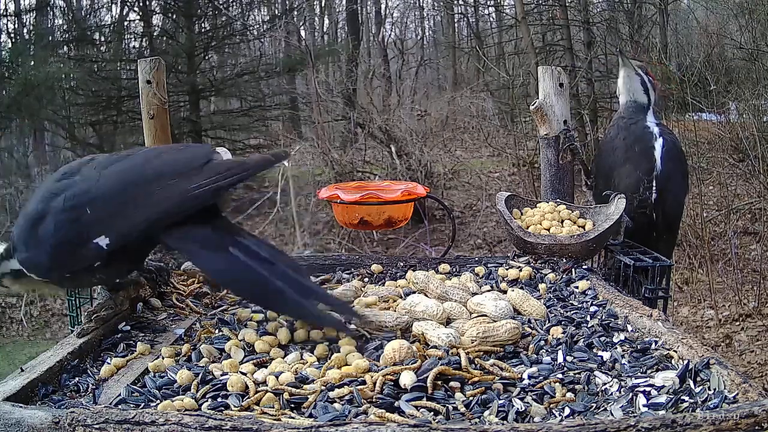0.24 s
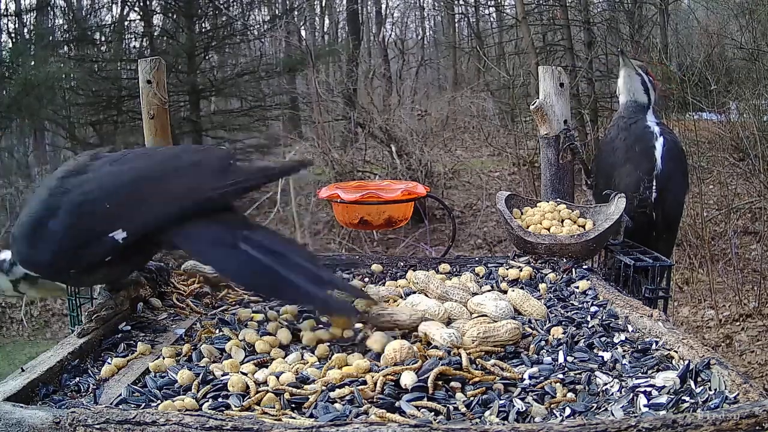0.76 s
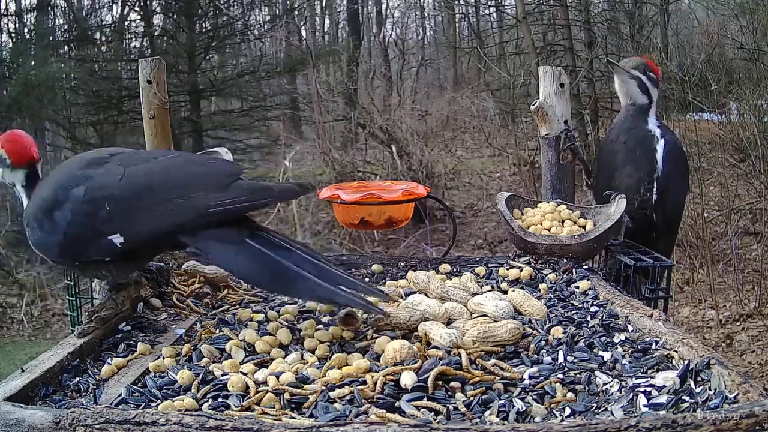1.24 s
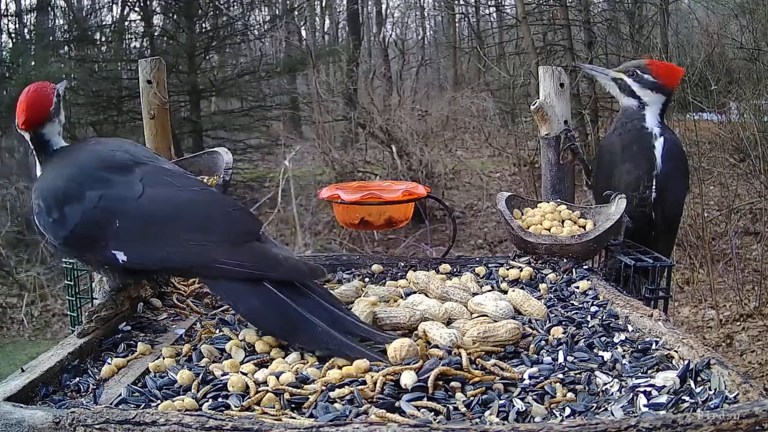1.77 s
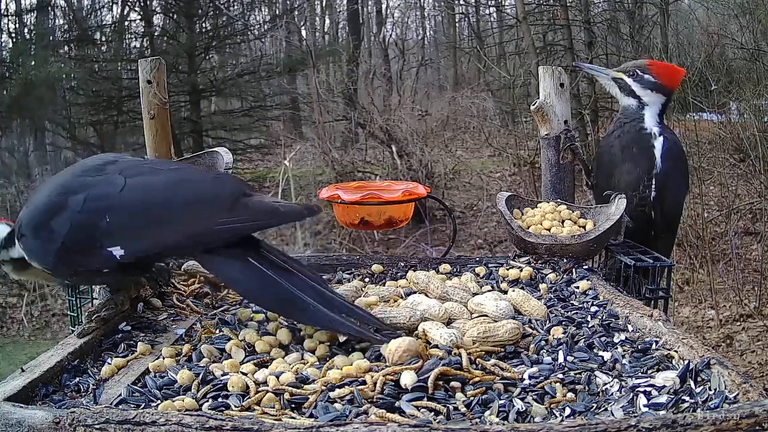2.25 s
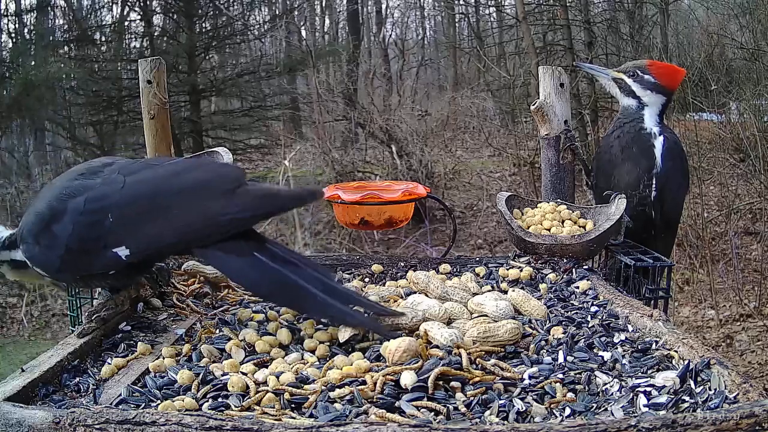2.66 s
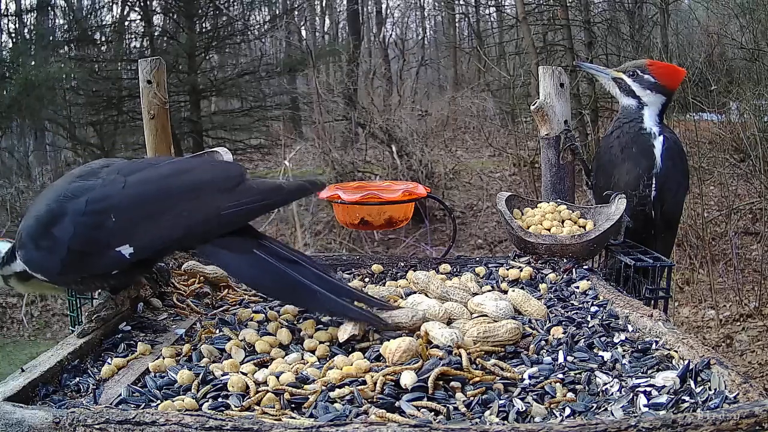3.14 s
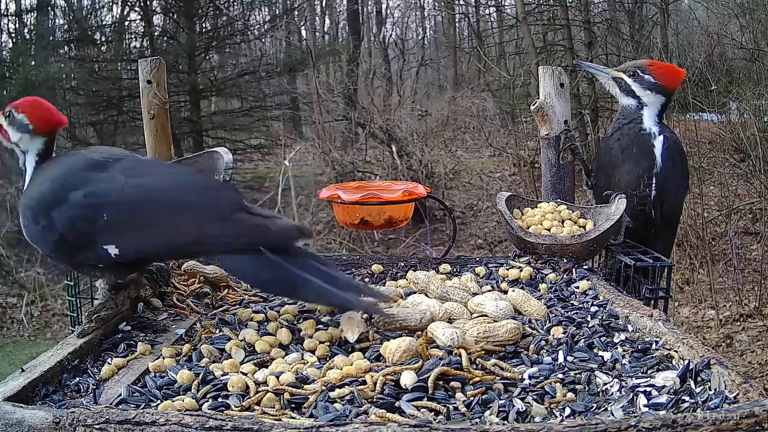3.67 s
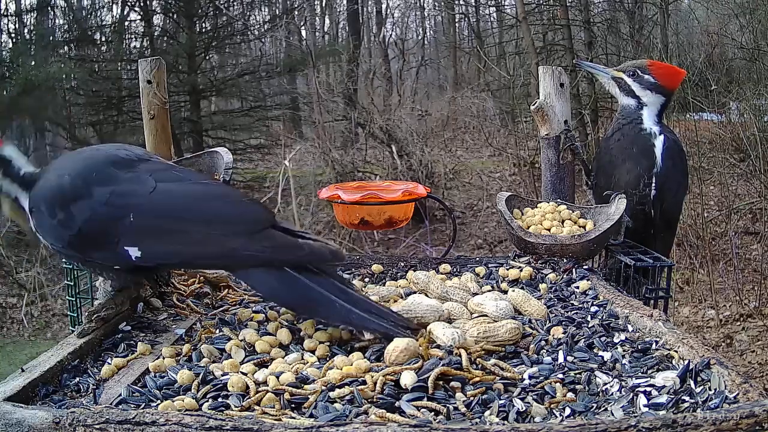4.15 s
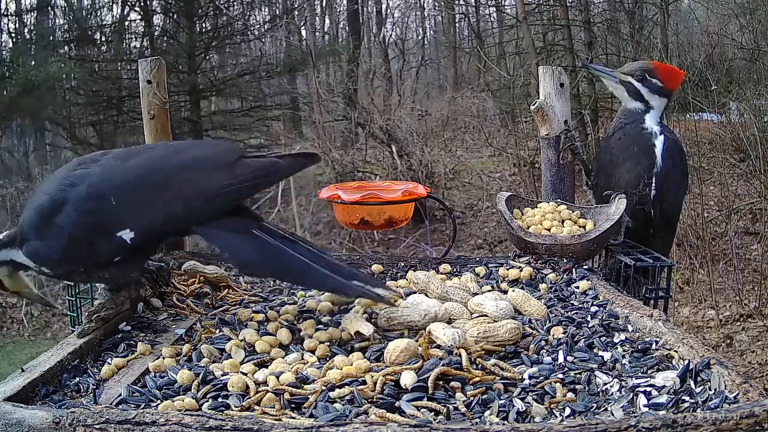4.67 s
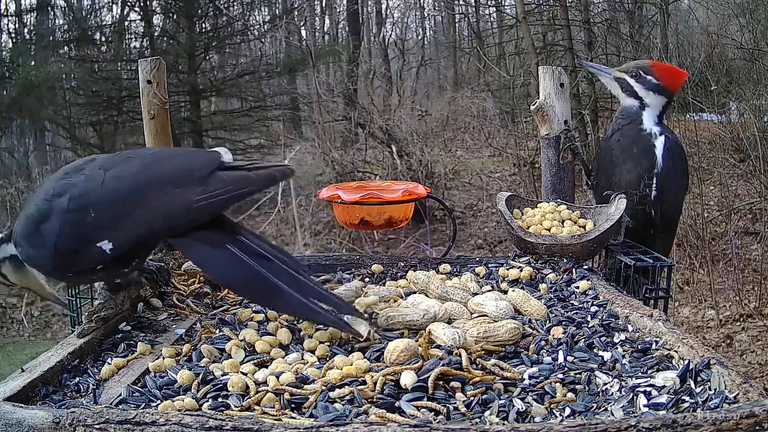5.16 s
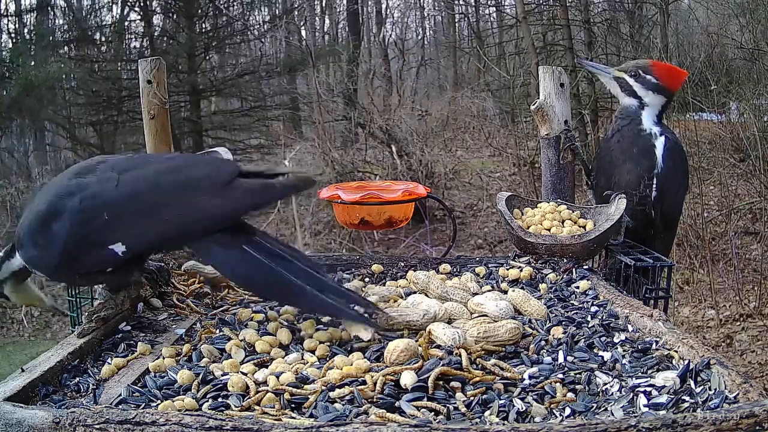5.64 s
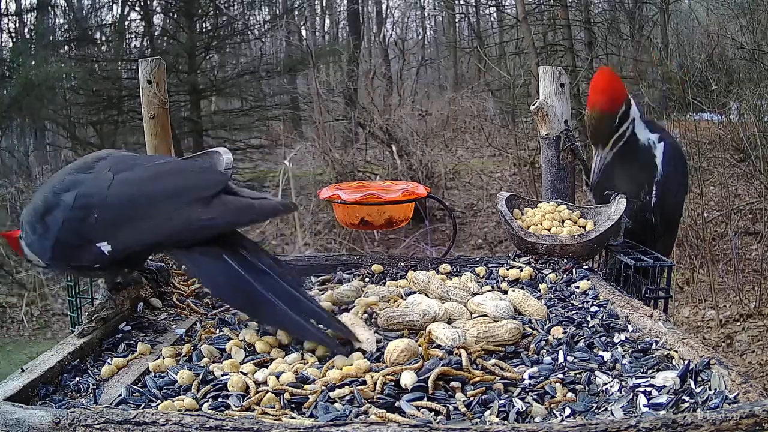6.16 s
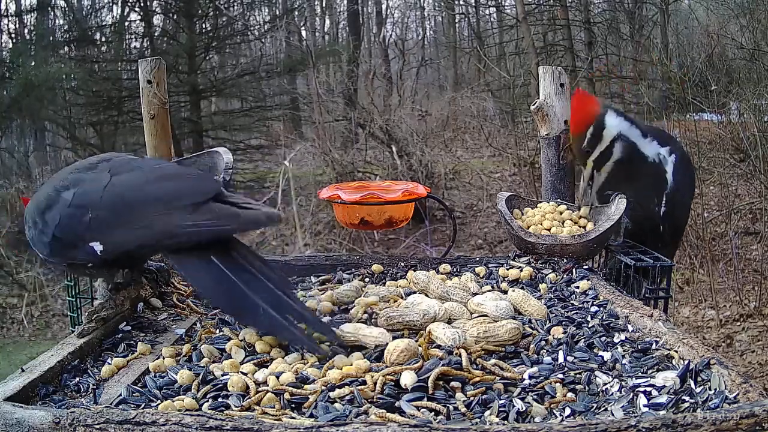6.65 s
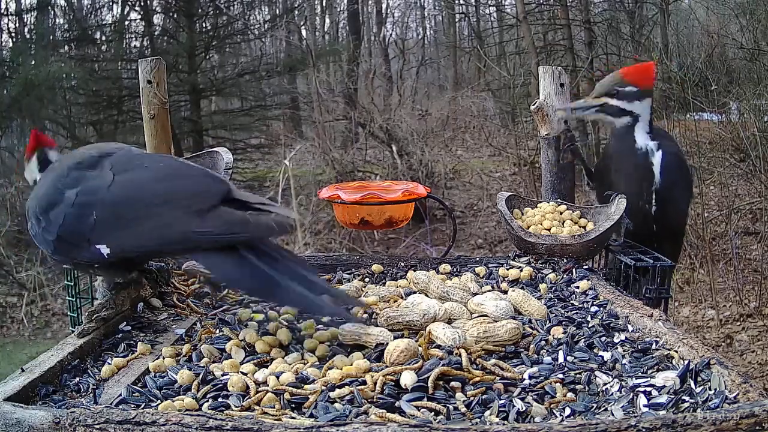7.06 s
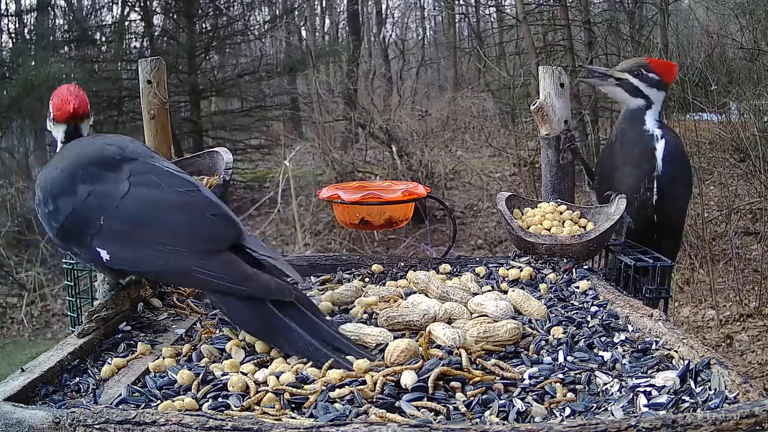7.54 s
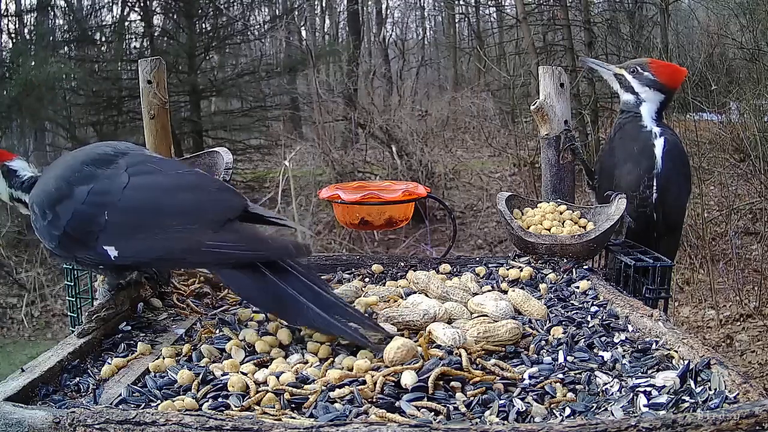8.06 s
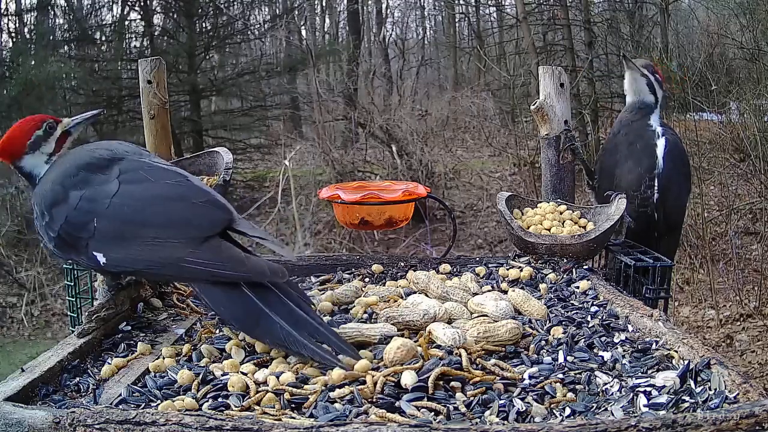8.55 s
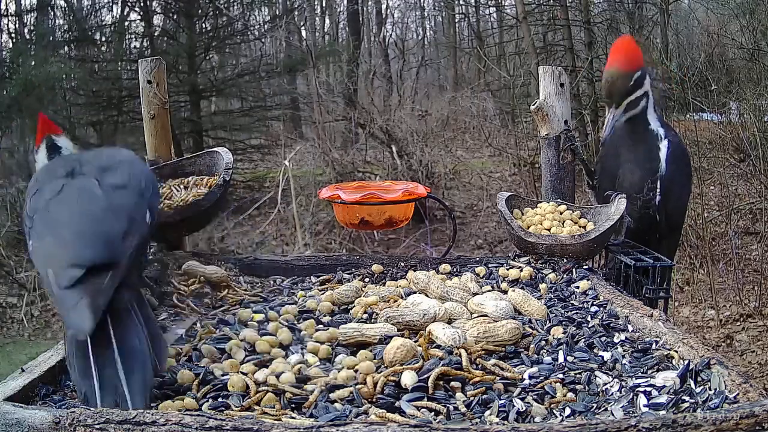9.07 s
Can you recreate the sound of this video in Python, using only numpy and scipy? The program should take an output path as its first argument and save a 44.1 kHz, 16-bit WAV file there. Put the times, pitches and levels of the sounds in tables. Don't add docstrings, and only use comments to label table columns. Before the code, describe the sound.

Very close on a wooden feeding tray, a woodpecker strikes three increasingly hard blows within the first second, boards booming and rattling, shells cracking. Lighter pecks follow, then another hard blow past the middle. A second bird knocks softly on a hollow wooden bowl. Songbird chips, thin peeps and faint nasal jay calls echo in bare woods over a low wandering engine drone and soft hiss.

```python
import sys
import numpy as np
from scipy import signal
from scipy.fft import rfft, irfft
from scipy.io import wavfile
from scipy.ndimage import uniform_filter1d

SR = 44100
rng = np.random.default_rng(int(sys.argv[2]) if len(sys.argv) > 2 else 0)


def file_out(sig):
    cols = np.atleast_2d(sig).T
    lim = np.clip(cols, -1, 1)
    pcm = np.round(lim * 32767).astype(np.int16)
    wavfile.write(sys.argv[1], SR, pcm)


def invert_db(x):
    u = np.asarray(x, float) / 20
    return 10 ** u


N = 410571

# start_s, knock_db, crack_db (re knock), board_fall_delay_s, board_fall_db
BLOWS = [
    (0.453, -35, -30, 0.042, -28.5),
    (0.729, -31, -23, 0.042, -28),
    (1.062, -26.5, -22, 0.041, -32),
    (2.597, -47.5, -24, .043, -64),
    (3.184, -38, -20, 0.043, -36.5),
    (3.657, -38.5, -17.5, 0.041, -39),
    (5.313, -47, -16, 0.043, -47),
    (5.642, -26.5, -21, 0.043, -29),
]


def coloured(points, db):
    hz, gain_db = np.transpose(points)
    f = np.maximum(np.fft.rfftfreq(N, 1 / SR), 1)
    gain = invert_db(np.interp(np.log(f), np.log(hz), gain_db, left=-60))
    x = irfft(rfft(rng.standard_normal(N)) * gain, N)
    return x / x.std() * invert_db(db)


def filtered(x, order, hz, kind):
    return signal.sosfilt(signal.butter(order, hz, kind, fs=SR, output="sos"), x)


def ring(x, modes):
    out = 0
    for hz, db, t60_s in modes:
        pole = np.exp(2j * np.pi * hz / SR - np.log(1000) / (t60_s * SR))
        out = out + invert_db(db) * signal.lfilter([0, pole.imag], [1, -2 * pole.real, abs(pole) ** 2], x)
    return out


def add(track, start_s, x):
    i = int(start_s * SR)
    track[i:i + len(x)] += x[:N - i]


def glide(at_s, hz, db):
    t = np.arange(at_s[0], at_s[-1], 1 / SR)
    phase = 2 * np.pi * np.cumsum(np.interp(t, at_s, hz)) / SR
    return phase, np.sqrt(2) * invert_db(np.interp(t, at_s, db))


def wood(x, t60_s, gap_s):
    t = np.arange(int(t60_s * SR)) / SR
    tail = rng.standard_normal(len(t)) * np.exp(-np.log(1000) * t / t60_s) * np.minimum(t / gap_s, 1)
    return signal.fftconvolve(x, tail / np.sqrt(np.sum(tail ** 2)))[:N]


def walk(rate_hz, count=N):
    k = int(SR / rate_hz)
    steps = np.repeat(rng.standard_normal(count // k + 1), k)
    x = uniform_filter1d(uniform_filter1d(steps, k), k)[:count]
    return x / x.std()


def crunch(shape, rise_s, fall_s):
    t = np.arange(shape[-1]) / SR
    envelope = np.exp(-t / fall_s) * (1 - np.exp(-(t / rise_s) ** 2))
    grains = invert_db(3.0 * rng.exponential(size=len(t)))
    grit = rng.standard_normal(shape) * envelope * grains
    return unit_energy(grit)


def unit_energy(x):
    return x / np.sqrt(np.sum(x ** 2, axis=-1, keepdims=True))


def motors(t):
    # at_s, pitch_hz, level_db
    engine = [(0, 113.7, -60.5), (.3, 112.3, -48.5), (.6, 115.1, -42.5), (1.2, 119.2, -49),
              (2.05, 121.1, -50), (2.4, 111.5, -52), (2.8, 111, -82), (3.5, 114.6, -50), (4.3, 113.5, -53),
              (5.3, 113.7, -48), (5.6, 111.1, -45), (6.2, 104.4, -63.5)]
    # start_s, length_s, start_hz, end_hz, level_db
    drones = [
        (1.1, 2.4, 93.1, 102.6, -59),
        (4.6, 1.85, 253, 252, -66),
        (7.2, 1.585, 172, 183.2, -72),
    ]
    drone = np.zeros(N)
    phase, gain = glide(*np.transpose(engine))
    add(drone, engine[0][0], gain * np.sin(phase))
    fade_s, fade_db = 0.14, -7
    for start_s, length_s, start_hz, end_hz, db in drones:
        at_s = np.array([0, fade_s, length_s - fade_s, length_s])
        hz = start_hz + (end_hz - start_hz) * at_s / length_s
        phase, gain = glide(at_s, hz, db + fade_db * np.array([1, 0, 0, 1]))
        add(drone, start_s, gain * np.sin(phase))
    return drone * invert_db(0.96 * walk(6.4))


def yard():
    # at_s, level_db
    rumble = [(0, -2.5), (.7, 2), (2.2, 0.5), (4.3, -0.5), (5.6, 2.5), (6.1, 2), (6.6, -0.5), (6.9, -2.5),
              (7.2, -0.5), (7.9, -0.5), (8.6, -1), (9.31, -0.5)]
    # freq_hz, level_db (per Hz)
    town = [(18, 7), (64, 0.5), (90, -4), (125, -7), (152, -16), (200, -20.5), (240, -19.5), (314, -21),
            (417, -25), (500, -25), (555, -26.5), (620, -27), (727, -36), (1000, -53.5)]
    # freq_hz, level_db (per Hz)
    air = [(500, -26), (800, -0.5), (1300, -1.5), (2000, -5), (3500, -8), (4500, -10), (8000, -8.5),
           (12000, -8.5), (15500, -12.5)]
    # freq_hz, level_db
    whines = [(9001, -95.5), (12000, -90.5)]
    # at_s, level_db
    fan_swell = [(0, 1), (1.2, -3), (2.05, 7), (2.6, -0.5), (3.2, 1.5), (4.2, 1.5), (5.05, 3.5), (5.8, 1.5),
                 (6.6, -1), (7.4, 1.5), (8.2, -2), (9.31, -2)]
    t = np.arange(N) / SR
    near_db = np.interp(t, *np.transpose(rumble))
    low = [p for p in town if p[0] < 140] + [(140, -16.0), (180, -68)]
    deep = coloured(low, 0.13) * invert_db(-47.5 + near_db + 1.6 * walk(5.4))
    high = [(100, -39.0)] + [p for p in town if p[0] >= 140] + [(1400, -67.0)]
    wash_db = -60 + 0.68 * near_db - 0.1246 * t
    wash = coloured(high, 0.18) * invert_db(wash_db + 0.56 * walk(4.4))
    fan = filtered(rng.standard_normal(N), 2, (520.7, 586.4), "band")
    fan_db = -69 + np.interp(t, *np.transpose(fan_swell)) + 1.95 * walk(8)
    wash += fan / fan.std() * invert_db(fan_db)
    whine = sum(np.sqrt(2) * invert_db(db) * np.sin(2 * np.pi * hz * t) for hz, db in whines)
    hiss = coloured(air, -69.5) * invert_db(0.062 * walk(21))
    return motors(t) + deep + wash + hiss + whine


def contacts():
    # start_s, level_db, ring_hz, click_db (re ring)
    taps = [(.058, -69, 1000, -26), (5.125, -60, 1200, -20), (0.386, -53, 1390, -29),
            (0.584, -52, 1110, -26), (0.837, -51, 1090, -12), (0.858, -50, 1130, -24),
            (0.914, -61, 1030, -17), (1.058, -41, 1130, -20), (1.082, -46, 1060, -20),
            (1.114, -38, 1140, -12), (0.504, -49, 1130, -28), (.569, -57, 1100, -18),
            (.847, -53, 1200, -22), (1.169, -53, 1150, -21), (1.191, -55, 1200, -21), (1.21, -55, 965, -19),
            (2.721, -47, 1300, -26), (2.77, -61, 1110, -14), (3.044, -61, 1270, -15),
            (3.852, -52, 1335, -22), (4.664, -54, 1390, -12), (5.322, -52, 1075, -17.5),
            (5.333, -55, 1200, -20), (5.378, -58, 1150, -22), (5.398, -54, 1100, -22),
            (.7855, -50, 1100, -24), (5.775, -51, 1200, -22), (1.05, -58, 1360, -13),
            (5.408, -52, 1040, -21), (5.669, -32, 1380, -15), (6.859, -47, 1060, -26),
            (6.948, -49, 1280, -27), (6.969, -48, 1380, -21), (7.117, -48.5, 1450, -14),
            (7.29, -52, 1300, -12), (7.974, -56, 1143, -14), (9.008, -54, 1110, -15),
            (9.273, -72.5, 930, -14), (9.297, -51.5, 1510, -9)]
    board_hz, light_click_db, light_boom_db = 1130, -36, -14.5
    rows = []
    for s, db, _, lag_s, fall_db in BLOWS:
        click_db = -17.5 + 4 * (fall_db + 26.5)
        rows.append((s + lag_s, fall_db, board_hz, click_db, db - fall_db - 7.5))
        rows.append((s + lag_s + 0.022, fall_db - 11.5, 1300, light_click_db, light_boom_db))
        if fall_db > -33:
            rows.append((s + 0.118, db - 14.5, board_hz, light_click_db, light_boom_db))
    return rows + [(*tap, light_boom_db) for tap in taps]


def light_contacts(bus):
    light = contacts()
    t = np.arange(900) / SR
    onset = 1 - np.exp(-(t / .002) ** 2)
    for (s, db, hz, click_db, boom_db), (turn, upper) in zip(light, rng.random((len(light), 2))):
        upper_hz = hz * (1.09 + 0.19 * upper)
        body = np.sin(2 * np.pi * hz * t) + 0.54 * np.sin(2 * np.pi * upper_hz * t + 6 * turn)
        add(bus["rattle"], s - .001, invert_db(db + 3.0) * onset * np.exp(-t / 0.003) * body)
        grit = rng.standard_normal(len(t)) * onset * np.exp(-t / 0.002)
        add(bus["crack"], s - .001, invert_db(db + click_db - 13.0) * grit)
        add(bus["hiss"], s - .001, invert_db(db + click_db + 1.0) * grit)
        add(bus["thud"], s - .001, invert_db(db + 0.5) * grit)
        add(bus["boom"], s, invert_db(db + boom_db) * np.hanning(60) / 30)


def blows(bus):
    # boom_db, deep_db, knock_db
    spots = [(-1, -4, -0.5), (5, 0, -3), (0, -7, 2), (1, -1, 2.5), (1, -8, 2), (-2, -5, -2), (-9, -10, 2),
             (2, 2, 2.5)]
    panel_levels = [-43, -36, -34, -62, -54, -59, -57, -33]
    # start_s, level_db
    thumps = [
        (5.33, -41),
        (.46, -40),
        (1.078, -35),
        (.757, -38.5),
        (2.607, -53),
        (5.658, -36),
    ]
    for (s, db, crack_db, *_), (boom_db, deep_db, knock_db), panel_db in zip(BLOWS, spots, panel_levels):
        add(bus["panel"], s + 0.01198, invert_db(panel_db) * np.hanning(24) / 12)
        s, grit = s - .003, crunch((4, 2600), 0.012, 0.011)
        add(bus["thud"], s, invert_db(db + 2.0) * grit[3])
        tip = invert_db(-11 + 0.96 * (db + 37.5)) * crunch((2, 1800), 0.0028, 0.011)
        add(bus["thud"], s + 0.00141, invert_db(-19.0) * tip[0])
        add(bus["crack"], s + 0.00192, invert_db(-57.0) * tip[1])
        add(bus["thud"], s, invert_db(db + 5) * crunch((5000,), 0.01, 0.051))
        push = -np.hanning(90) / 45
        add(bus["boom"], s + 0.00719, invert_db(db + boom_db - 8.5) * push)
        add(bus["deep"], s + 0.0054, invert_db(db + deep_db - 6.5) * push.sum() * np.hanning(120) / 60)
        add(bus["deep"], s, invert_db(db + deep_db + 0.5) * grit[3])
        add(bus["boom"], s, invert_db(db + boom_db - 1.5) * grit[0])
        add(bus["knock"], s, invert_db(db + knock_db - 3.5) * grit[1])
        add(bus["crack"], s, invert_db(db + crack_db - 3.5) * grit[2])
        even = grit[2] * .08 / (.08 + abs(grit[2]))
        add(bus["hiss"], s, invert_db(1.1 * (db + crack_db) + 23.0) * even)
        add(bus["sway"], s + 0.01, invert_db(-29.5 + 0.68 * (db + 31.0)) * np.hanning(300) / 150)
    for s, db in thumps:
        add(bus["boom"], s, invert_db(db) * np.hanning(70) / 35)


def shells(bus):
    # start_s, level_db, hiss_db (re crack)
    splits = [(0.457, -59.5, -30), (.481, -76, -14), (0.708, -74, -4), (0.7354, -48.5, -5), (.75, -63, -5),
              (.7585, -68, -8), (1.0586, -60, 6), (1.0649, -51, -4), (1.072, -54, -7), (1.0831, -48, -7),
              (1.1, -55, -12), (1.1128, -56.5, -11), (1.131, -70, -2), (0.4928, -55, -14), (.516, -68, -20),
              (.768, -53, -12), (0.8366, -73, 1), (.858, -77, -12), (2.597, -66, -16), (3.225, -70, -14),
              (5.707, -69, -12), (5.76, -76, -11), (3.183, -59, -15), (3.1892, -61, -18),
              (3.6583, -62, -18), (5.6486, -45.5, -10), (5.654, -47, -11), (5.663, -51, -12),
              (5.668, -52, -13), (5.6835, -54, -9)]
    # start_s, level_db
    snaps = [
        (1.7586, -91),
        (1.8292, -82.5),
        (2.194, -75.5),
        (5.1256, -96),
        (6.9192, -90),
        (6.9698, -81.5),
    ]
    t = np.arange(900) / SR
    for s, db, hiss_db in splits:
        noise = rng.standard_normal((2, len(t)))
        snap = noise[0] * np.exp(-t / 0.0017)
        add(bus["crack"], s, invert_db(db - 12) * snap)
        add(bus["hiss"], s, invert_db(db + hiss_db + 10) * noise[1] * np.exp(-t / 0.0026))
        add(bus["thud"], s, invert_db(db + 1) * snap)
    for s, db in snaps:
        add(bus["hiss"], s, invert_db(db + 30.5) * rng.standard_normal(300) * np.exp(-t[:300] / 0.0019))


def tray():
    # freq_hz, level_db, t60_s
    deep_modes = [(132, -30, 0.063), (149, -3.5, 0.19), (189.4, -1.5, 0.29), (217.5, -10, 0.25)]
    boom_modes = [(281, 5, 0.092), (304.6, 3.5, 0.12), (362, -14, 0.018), (372, -8.5, 0.13),
                  (448, -4.5, 0.058), (505, -8.5, 0.09), (557, -8, 0.097), (707, -11.5, 0.025)]
    knock_modes = [(738.4, -6.5, 0.12), (836, -13.5, 0.064), (1040, -28, 0.063), (1121, 1, 0.056),
                   (1200, -11, 0.14), (1295, -5.5, 0.051), (1450, -36, 0.044), (1784, -7, 0.014),
                   (2070, -5.5, 0.016)]
    crack_modes = [(1980, 5, 0.0061), (2400, 5.5, 0.0066), (2860, -16, 0.0058), (2900, 6, 0.0073),
                   (3140, 4, 0.019), (3360, -39, 0.016), (4210, -53, 0.0079)]
    panel_modes = [(743.5, -2.5, 0.12), (553, -4, .08)]
    sway_modes = [(30, -27, .3), (48.23, 2.5, 0.71), (58.4, -37, 0.4)]
    names = ("deep", "boom", "knock", "crack", "panel", "sway", "rattle", "hiss", "thud")
    bus = {name: np.zeros(N) for name in names}
    light_contacts(bus)
    blows(bus)
    shells(bus)
    bright = filtered(bus["hiss"], 2, [4200, 12500], "band")
    body = filtered(bus["thud"], 2, [450, 3000], "band") + ring(bus["crack"], crack_modes)
    body = filtered(body, 6, 3900, "low")
    boards = ring(bus["deep"], deep_modes) + ring(bus["boom"], boom_modes) + ring(bus["knock"], knock_modes)
    frame = ring(bus["panel"], panel_modes) + ring(bus["sway"], sway_modes)
    return boards + frame + body + bus["rattle"] + bright


def small_birds():
    peep_times = [0.337, 1.151, 1.539, 1.780, 2.254, 2.352, 3.256, 3.563, 3.767, 3.827, 3.927, 4.215, 4.462,
                  4.559, 4.834, 5.171, 5.261, 5.565, 5.870, 6.132, 6.430, 6.689, 6.919, 7.176, 7.477, 7.704,
                  8.010, 8.318, 8.757, 9.132]
    # start_s, level_db, blur_db (echo re direct)
    chips = [
        (0.9487, -57.5, -1),
        (1.894, -48.5, -8),
        (3.1358, -49.5, -15),
        (4.121, -45, -15),
        (5.022, -44, -21),
        (6.172, -45.5, -14),
        (7.389, -62.5, 4),
        (8.251, -52.5, -11),
    ]
    # at_s, pitch_hz, level_db
    chip_shape = [(0, 5350, -46), (.002, 5520, -1), (.005, 6590, 6), (.008, 7540, 1), (0.012, 7600, -5),
                  (0.019, 7840, -6), (.025, 7900, -19)]
    dry, wet = np.zeros((2, N))
    peep = np.hanning(330)
    t = np.arange(len(peep)) / SR
    for s, bend in zip(peep_times, rng.standard_normal(len(peep_times))):
        add(dry, s - .002, invert_db(-64) * peep * np.sin(2 * np.pi * (5640 + 30 * bend) * t))
    at_s, hz, shape_db = np.transpose(chip_shape)
    for (s, db, blur_db), bend in zip(chips, rng.standard_normal(len(chips))):
        phase, gain = glide(at_s, hz * (1 + 0.008 * bend), shape_db + db - 7.5)
        octave = invert_db(-4.5) * np.sin(2 * phase) * np.exp(-np.arange(len(phase)) / 130)
        note = gain * (np.sin(phase) + octave)
        add(dry, s - .002, note)
        add(wet, s, invert_db(blur_db) * note)
    return dry + wood(wet, 0.59, 0.0034)


def jays():
    # start_s, length_s, level_db, pitch_factor, final_drop_depth
    calls = [
        (1.729, 0.29, -65, 1.0, 1.0),
        (4.35, 0.26, -65.5, 0.99, 0.9),
        (5.964, .283, -66, 1.003, 1.03),
        (8.584, 0.27, -68.5, 0.99, 1.29),
    ]
    # echo_db, top_overtone_db
    turns = [(-1.5, 2), (-3, -14), (0, -2), (-3, -3)]
    # share_of_length, pitch_hz, effort_db
    call_shape = [(0, 786, -8), (.022, 800, -8), (.04, 890, -15), (.065, 912, -7), (.3, 900, -1),
                  (.6, 889.6, 0), (.8, 876, -1.5), (.88, 853, -3), (.94, 836, -3), (.97, 812, -8),
                  (1, 788, -14)]
    # multiple, level_db, db_per_effort_db, echo_db
    tones = [(2, -2.5, 1, -0.5), (3, -0.5, 1.3, -2), (4, -3, 0.45, 1), (6, -16.5, 2.5, 0)]
    # start_s, length_s, pitch_hz, level_db
    gulps = [
        (1.996, 0.029, 2520, -61.5),
    ]
    dry, away = np.zeros((2, N))
    share, hz, effort_db = np.transpose(call_shape)
    for (s, length_s, db, scale, drop), (echo_db, top_db) in zip(calls, turns):
        pitch_hz = scale * np.where(hz < 870, 870 - drop * (870 - hz), hz)
        for multiple, tone_db, follows, far_db in tones:
            multiple = round(multiple)
            level_db = db + tone_db + top_db * (multiple > 5) + follows * effort_db
            phase, gain = glide(share * length_s, pitch_hz, level_db)
            beat = walk(45, count=len(phase))
            blur = walk(120, count=len(phase))
            add(dry, s, gain * invert_db(1.7 * beat) * np.sin(multiple * phase))
            tone = gain * np.sin(multiple * (phase + np.cumsum(.006 * blur * np.gradient(phase))))
            turn_db = 18 * np.linspace(-1, 0, len(tone))
            add(away, s, tone * invert_db(echo_db + far_db + turn_db))
    for s, length_s, gulp_hz, db in gulps:
        n = int(length_s * SR)
        add(dry, s, invert_db(db + 4.5) * np.hanning(n) * np.sin(2 * np.pi * gulp_hz * np.arange(n) / SR))
    high = filtered(away, 2, 2800, "high")
    echo = wood(high * invert_db(4.9 * walk(250)), 0.84, 0.025) * invert_db(1.2 * walk(40))
    return dry * invert_db(0.44 * walk(40)) + invert_db(4.5) * echo


def rustles():
    # start_s, length_s, centre_hz, level_db
    swells = [
        (2.7, 0.12, 5700, -82),
        (4.245, 0.3, 6200, -73),
        (4.24, .15, 16000, -86),
        (6.05, 0.23, 5000, -73.5),
        (8.742, 0.22, 4500, -74),
    ]
    out = np.zeros(N)
    for s, length_s, hz, db in swells:
        n = int(length_s * SR)
        noise = filtered(rng.standard_normal(n), 1, [0.68 * hz, 1.25 * hz], "band")
        add(out, s, invert_db(db + 7.0) * np.hanning(n) * noise)
    return out


def far_calls(calls, phrase, wet_db, t60_s):
    notes = [(s + at_s, length_s, start_hz, end_hz, db + note_db)
             for s, db in calls for at_s, length_s, start_hz, end_hz, note_db in phrase]
    dry = np.zeros(N)
    flutter = 2 * np.pi * np.cumsum(.016 * notes[0][3] * walk(80)) / SR
    for s, length_s, start_hz, end_hz, db in notes:
        at_s = np.array([0, .2, .8, 1]) * length_s
        hz = start_hz + np.array([0, .3, .9, 1]) * (end_hz - start_hz)
        phase, gain = glide(at_s, hz, db + np.array([3.5, 0.5, -2.0, -11]))
        add(dry, s, gain * np.sin(phase + flutter[int(s * SR):][:len(phase)]))
    dry *= invert_db(2.5 * walk(70))
    echo = invert_db(wet_db) * wood(dry, t60_s, 0.03) * invert_db(4 * walk(200) - 1)
    return (dry + echo) * invert_db(1.5 * walk(30) - 1)


def far_cackle():
    # start_s, level_db
    calls = [(2.88, -82), (4.42, -76), (4.55, -76), (4.92, -80), (5.1, -77.5), (5.36, -68.5), (5.43, -71.5),
             (5.52, -74), (5.82, -65.5), (6.08, -73), (6.32, -68), (6.62, -72), (6.84, -77), (7.05, -75),
             (7.22, -72.5), (7.32, -76), (7.42, -80)]
    # at_s, length_s, start_hz, end_hz, level_db
    arch = [
        (0, 0.0435, 1200, 1440, 0),
        (.045, .04, 1416, 1248, -4.5),
    ]
    return far_calls(calls, arch, 1.5, 1.6)


def far_song():
    # start_s, level_db
    calls = [
        (3.7, -77.5),
        (3.965, -77),
        (7.655, -79.5),
        (7.98, -76),
        (8.305, -76),
    ]
    # at_s, length_s, start_hz, end_hz, level_db
    phrase = [
        (0, 0.044, 2146, 2336, -2),
        (0.048, 0.035, 2400, 2746, 2),
        (0.091, 0.0355, 2600, 2185, 0.5),
        (0.143, .03, 2380, 2540, 3.5),
        (0.205, 0.06, 2220, 2630, -2),
    ]
    return far_calls(calls, phrase, 2.7, 0.73)


def bowl():
    # start_s, level_db, softness (0-1)
    hits = [
        (3.701, -43.5, 0.95),
        (6.466, -40, 0.72),
        (6.912, -48.5, 0.96),
        (6.959, -58, 0.91),
        (7.0, -53, 0.95),
    ]
    # freq_hz, level_db, t60_s
    bowl_modes = [(302, -1.5, 0.19), (332, 2.5, 0.13), (417, 2, 0.043), (538, 6.5, 0.1), (583, -7, 0.042),
                  (750, 2, 0.057), (900, -12, 0.035), (1108, 6, 0.05), (1260, -13, .05), (1610, -21, 0.022),
                  (2300, -23, 0.061), (2940, -25, .03)]
    force = np.zeros(N)
    push = unit_energy(np.hanning(int(0.002 * SR)))
    for s, db, soft in hits:
        soft = np.clip(soft, 0, .98)
        touch = signal.lfilter([(1 - soft) ** 2], [1, -2 * soft, soft ** 2], crunch((1600,), 0.0047, 0.014))
        add(force, s, invert_db(db + 2.0) * touch)
        add(force, s + 0.00406, -invert_db(db - 15) * (1 - soft) * push)
    return ring(force, bowl_modes) + invert_db(18) * filtered(force, 2, (280, 2600), "band")


def scene():
    birds = small_birds() + jays() + far_cackle() + far_song()
    mono = yard() + tray() + birds + rustles() + bowl()
    return np.array([mono, mono])


def band_limit(x):
    return signal.sosfilt(signal.butter(12, 15700, fs=SR, output="sos"), x)


def record(dry):
    # at_s, above_hz
    smeared = [
        (.95, 6900),
        (.97, 6900),
        (1.905, 6600),
        (5.04, 5300),
        (8.265, 6500),
    ]
    f, t, z = signal.stft(.2 * np.tanh(dry[0] / .2), SR, nperseg=2048, noverlap=1024)
    band = (f // 517).astype(int)
    bins = [np.abs(z[band == b]) ** 2 for b in range(band[-1] + 1)]
    power = np.array([p.mean(axis=0) for p in bins])
    peaky = np.array([p.max(axis=0) for p in bins]) / power
    loud = power / np.median(power, axis=1, keepdims=True)
    luck = uniform_filter1d(rng.standard_normal(power.shape), size=3, axis=0)
    luck = uniform_filter1d(luck, size=2, axis=1)
    noisy = (luck > -.33 + .13 * loud) & (peaky < 6)
    treble = (f > 4100) & (abs(f - 11900) > 250)
    swapped = noisy[band] & treble[:, None]
    for s, hz in smeared:
        swapped[(f > hz) & (f < 8270), np.argmin(abs(t - s))] = True
    rough = invert_db(1.6 * rng.standard_normal(power.shape))[band]
    noise = rng.standard_normal((2, *z.shape)) + 1j * rng.standard_normal((2, *z.shape))
    fresh = rough * np.sqrt(power[band] / 2) * noise
    passed = (f < 15690)[:, None]
    mid = np.where(swapped, invert_db(1.0) * fresh[0], z) * passed
    side = invert_db(-1.0) * swapped * fresh[1] * passed
    mid, side = (signal.istft(x, SR, nperseg=2048, noverlap=1024)[1][:N] for x in (mid, side))
    return band_limit(np.array([mid + side, mid - side]))


dry = scene()
out = record(dry)
file_out(out)
```